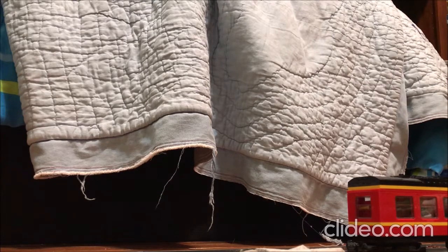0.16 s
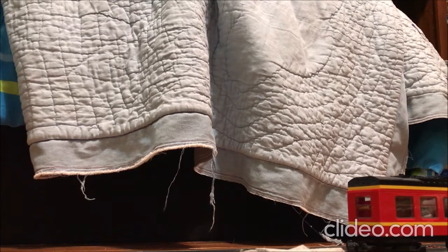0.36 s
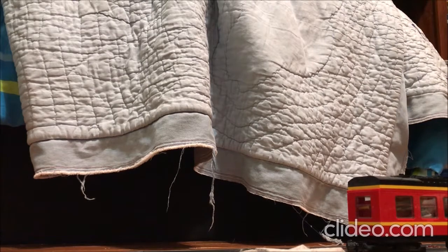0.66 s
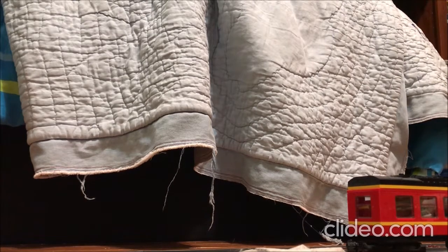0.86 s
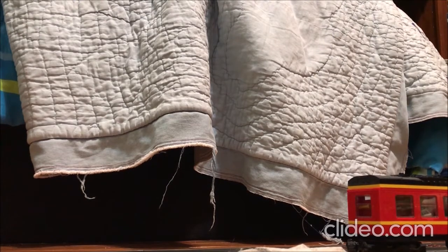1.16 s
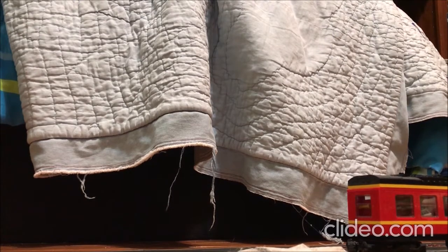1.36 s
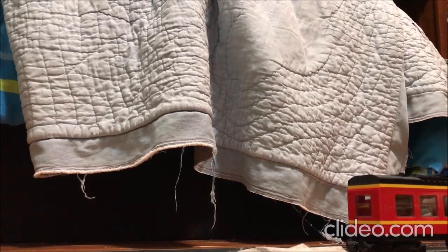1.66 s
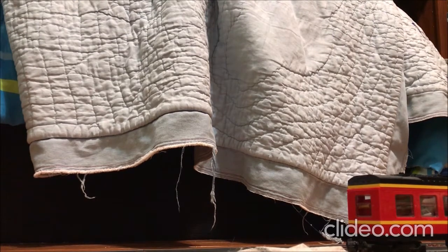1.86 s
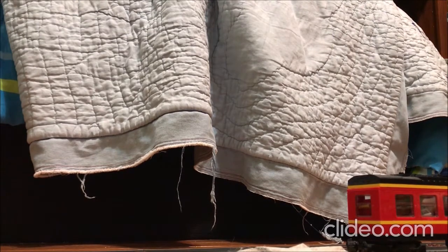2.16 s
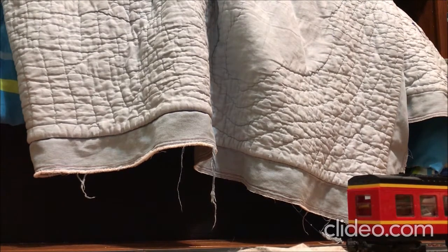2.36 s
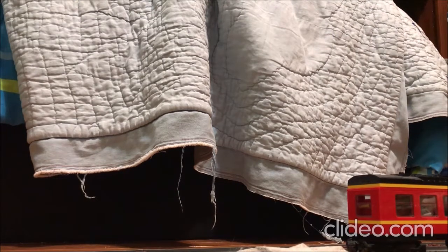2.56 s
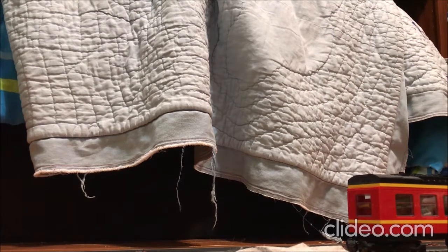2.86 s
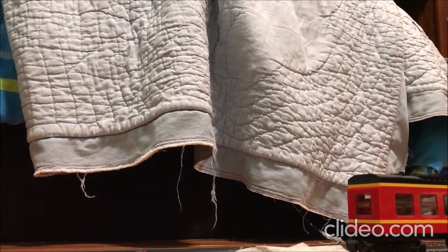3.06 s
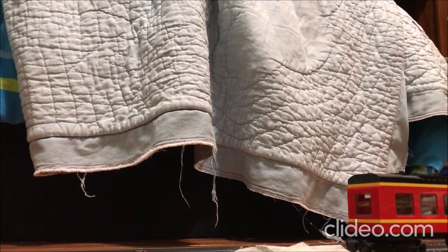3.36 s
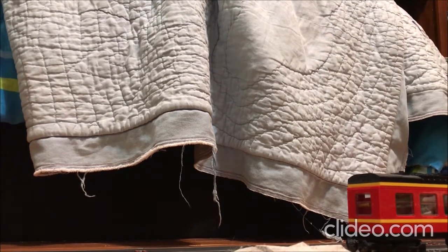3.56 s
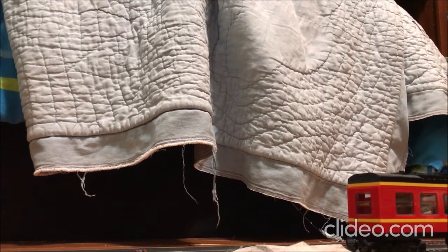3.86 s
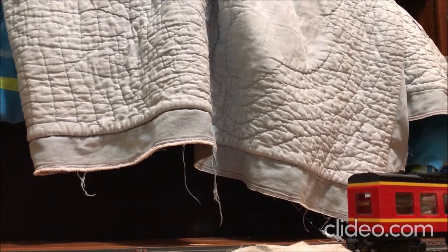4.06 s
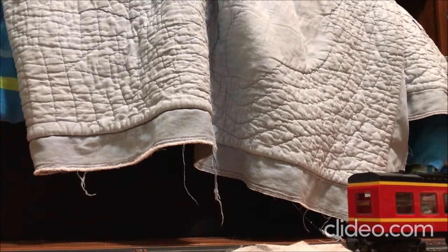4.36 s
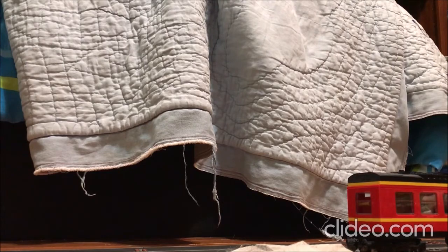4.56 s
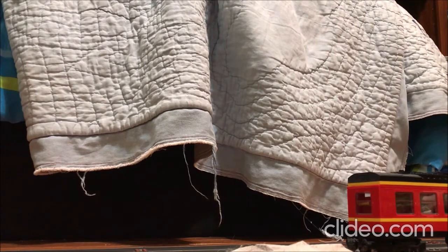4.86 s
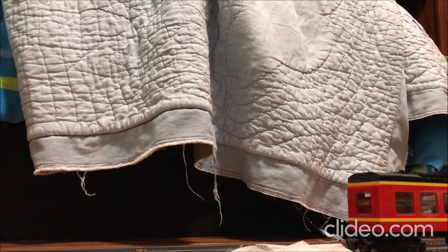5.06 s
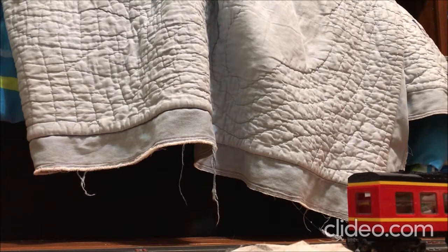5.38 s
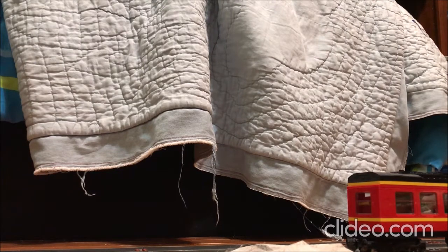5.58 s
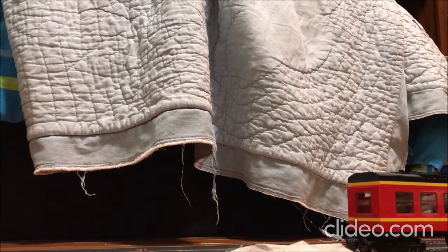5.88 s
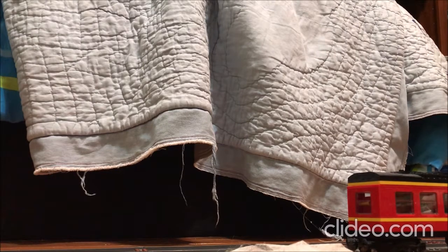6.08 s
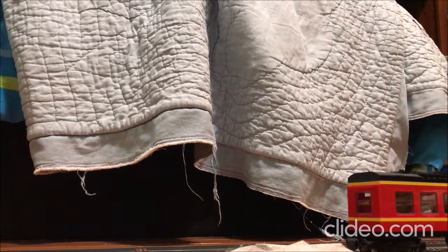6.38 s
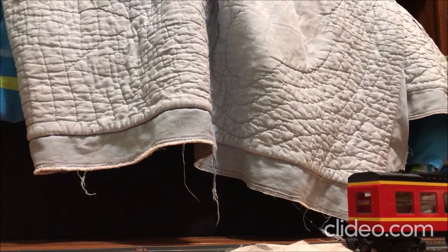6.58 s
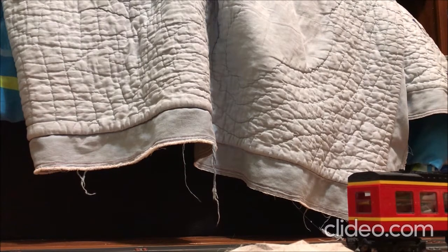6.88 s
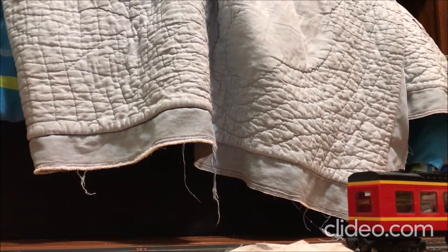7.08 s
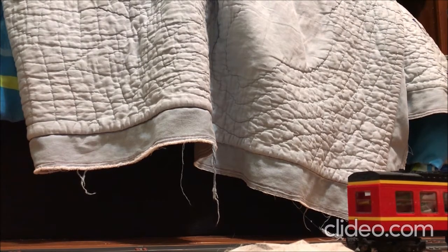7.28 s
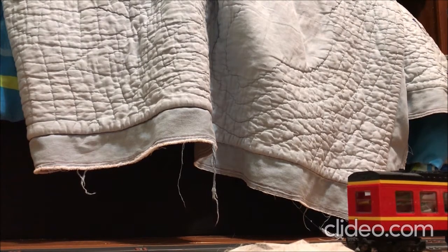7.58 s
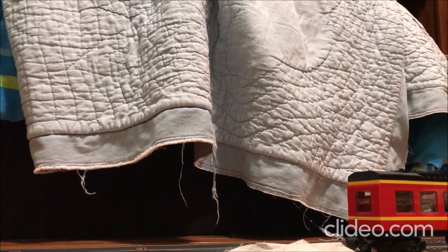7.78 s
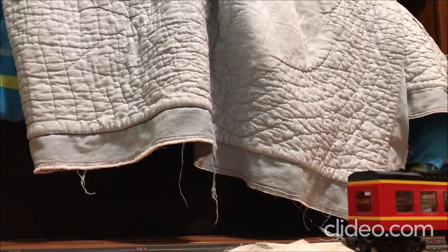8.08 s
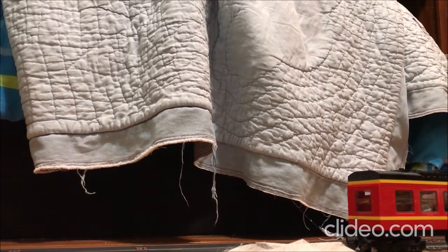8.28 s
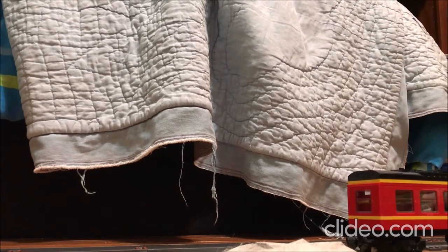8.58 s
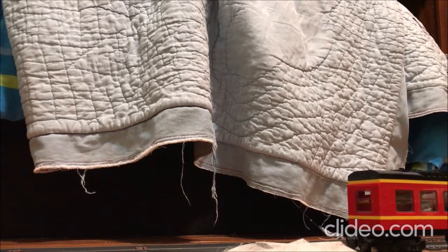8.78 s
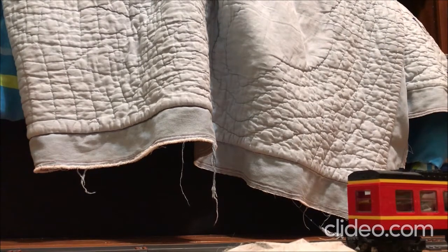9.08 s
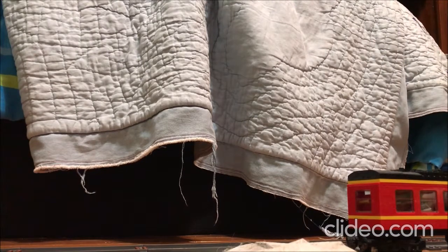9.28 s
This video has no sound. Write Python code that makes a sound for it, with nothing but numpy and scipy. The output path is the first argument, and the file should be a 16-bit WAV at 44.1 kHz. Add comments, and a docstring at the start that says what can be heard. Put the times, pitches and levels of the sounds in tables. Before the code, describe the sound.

Hands rummage through hollow plastic toy bricks close to a phone microphone. Bright clicks and short gritty scrapes cluster in the first second and a half, thin to sparse ticks, then return in busier bursts with two strong clacks late on. Soft floor thuds sit under a few knocks. A faint low motor hum and hiss continue throughout in a small, dull, cloth-softened room.

```python
"""Hollow plastic bricks click and scrape as hands sort and press them on a cloth-strewn floor.
Ragged contacts excite their modes: clicks are single blows, scrapes are streams of tiny slips.
Soft thuds are decaying sines; a small soft room adds a short dull tail to all these contacts.
Behind them a motor hums as wavering sines, and coloured noise makes the room air and microphone hiss.
The phone close by cuts the top."""
import sys
import numpy as np
from scipy import signal
from scipy.fft import rfft, irfft
from scipy.io import wavfile
from scipy.ndimage import uniform_filter1d

SR = 44100
rng = np.random.default_rng(int(sys.argv[2]) if len(sys.argv) > 2 else 0)


def generate_wav(sig):
    """Save sig (samples, or channels by samples) to the path in sys.argv[1] as 16-bit PCM at SR."""
    pcm = np.round(np.clip(np.atleast_2d(sig).T, -1, 1) * 32767).astype(np.int16)
    wavfile.write(sys.argv[1], SR, pcm)


N = 415863

# Brick clicks: start_s, wall_peak_db, then hollow_db, body_db, edge_db (peaks against the wall ring),
# near_hz (low mode nearest the blow)
BRICK_CLICKS = [(0.221, -48.5, -11.5, -18, 3, 990), (0.262, -44.5, -16, -4, 0.5, 912),
                (0.3425, -38, -9, -23, -4, 614), (0.3537, -27, -39, -28, -4, 2600),
                (0.3637, -29, -31, -25, 0, 2160), (0.407, -25, -37, -5, -3.5, 1720),
                (0.4334, -27, -17, -0.5, 1.5, 1980), (0.4474, -29.5, -13, -1.5, -6, 2020),
                (0.482, -35.5, -16, -13, 6, 2120), (0.7267, -41, -7, -19, -9, 775),
                (0.7794, -36.5, -13, -5, -16, 704), (0.8243, -31, -28, -17, -13, 2370),
                (0.828, -34, -28, -12, -3, 2400), (0.851, -31, -29, -16, -4, 2430),
                (0.8537, -18, -18, -22, -3.5, 2260), (0.8581, -21, -23, -5.5, -17, 2460),
                (0.868, -27, -6, -11, -8, 2300), (0.9064, -22.5, -38, -20, -14, 2370),
                (0.9764, -39, 1, -6, -13, 646), (1.1113, -51, -11, -19, -18, 727),
                (1.212, -38, -11, -7, -11, 2170), (1.264, -29.5, -29, -8, -4.5, 2390),
                (1.2751, -38, 3, 0, -14, 780), (1.2895, -41, -12, 7, -11, 2120),
                (1.3257, -15, -25, 0, -20, 1810), (1.3747, -19, -16.5, -2, -34, 2150),
                (1.4066, -24.5, -13, -1.5, -33, 2130), (1.465, -31.5, -7, -20, -7, 775),
                (1.51, -18, -24, -4, -19, 2170), (1.5691, -42.5, 6.5, 4, -20, 740),
                (1.583, -45, -15, 6, -17, 2200), (1.6366, -37.5, -27, 3, 0, 2470),
                (1.6547, -41, -10, 4, -7, 2120), (1.6788, -32, -31, -1.5, 2, 2230),
                (1.691, -40, -24, -8, -8, 2480), (1.916, -47, -7.5, 3.5, 5, 2540),
                (2.053, -50.5, -10, -17, -0.5, 2400), (2.156, -42.5, -33, -16, -4.5, 2600),
                (2.161, -43, -28, -15, -8, 2500), (2.2277, -35.5, -29, -13, -3.5, 2580),
                (2.272, -41, -31, -29, -3, 2370), (2.3067, -45, -8, -5, -5, 1200),
                (2.357, -37.5, -21, -30, -1, 1030), (2.4674, -54.5, 2.5, 0, -8, 931),
                (2.5335, -40.5, -3, -28, -16, 703), (2.6579, -52.5, 12, -5, -9, 945),
                (2.7426, -45, -20, -17, -24, 958), (2.992, -42, -28, -5.5, -2, 2130),
                (3.1907, -44.5, -22, -2, 0.5, 1040), (3.3005, -26.5, -8.5, -0.5, -2.5, 2020),
                (3.341, -32, -15, -3, -1, 2090), (3.3913, -47.5, -5, 12.5, -14, 2240),
                (3.5915, -34, -15, -3, -9, 2140), (3.627, -37, -17, -8, -18, 2260),
                (3.727, -40, -24, 0, -17, 2200), (3.815, -43, -15.5, -3, -5, 2250),
                (3.8738, -42, -13, 2, -7, 2200), (4.043, -40.5, -20, -2.5, -4, 2200),
                (4.0908, -39, -28, -6, -25, 2330), (4.1453, -41, -16, -12, -9, 1310),
                (4.2482, -50.5, -12.5, -18, -13, 2240), (4.545, -44, -17, -7.5, -1, 2300),
                (4.5743, -44.5, -22, -4, 3, 1050), (4.6795, -47.5, -18, -1, 7, 2250),
                (5.201, -34.5, -16, -8.5, -30, 1250), (5.2698, -45.5, -16, -7, -24, 2210),
                (5.3955, -37.5, -35, -2, -22, 1800), (5.7394, -50, -23, 4, -8, 2300),
                (6.0861, -50.5, -2, 4, -11, 2320), (6.288, -36, -29, -1, -17, 2140),
                (6.2954, -29.5, -25, -3, -4, 2450), (6.357, -19, -45, -11.5, -17, 2140),
                (6.3972, -30.5, -18, -2.5, 3.5, 2140), (6.4822, -44, -11, 3, -10, 1250),
                (6.6037, -43.5, -6, -9, -25, 900), (6.6421, -19.5, -29, -4, -3.5, 1380),
                (6.66, -36.5, -4, -4, -3, 1500), (6.7432, -41, -12, -1, 7, 2590),
                (6.786, -34, -15, -1, -4, 2450), (6.793, -33.5, -6.5, -4, 0, 1324),
                (6.8157, -30.5, -21, 7.5, 3.5, 1460), (6.8849, -30, -15, 0, -4.5, 1230),
                (7.0383, -40.5, -18, -4, -17, 2530), (7.217, -11.5, -8, -2.5, -6.5, 822),
                (7.3374, -40, -20, -8, -0.5, 2550), (7.3813, -30, -14, -3.5, -34, 2500),
                (7.436, -43, 1, 5, -21, 610), (7.585, -38, -29, -26, -10, 1480),
                (7.6305, -34.5, -13, -5, -11, 2260), (7.649, -33, -29, -23, 1, 2360),
                (7.831, -41.5, -7, -2, -23, 2040), (7.8507, -40, -17, -8, 3, 2200),
                (7.86, -37, -7, -6, -3, 1130), (7.9317, -43, -8, -12, -19, 1120),
                (7.954, -40, -17, -11, 4, 1240), (7.9743, -48, -18, -12, -5, 2200),
                (8.0292, -38, -15, -11, -0.5, 1070), (8.086, -42, -14, -4, -3, 1450),
                (8.1634, -37, -28, -6, 0, 1200), (8.2104, -46, -29, -6, -9, 2200),
                (8.2248, -38, -33, -8, 9, 1980), (8.246, -45, -24, -16, 3, 2200),
                (8.3583, -28.5, -44, -6, -12, 2550), (8.4387, -39, -25, -8.5, 8, 2080),
                (8.522, -40, -23, -5.5, -3, 713), (8.692, -35.5, -24, -9.5, -14, 2440),
                (8.7144, -36, -16, -1.5, -3, 2390), (8.7563, -40, -28, -7, 3, 1530),
                (8.82, -43, -15, 2, -7, 1400), (8.8357, -41, -17, -8, 6, 2210),
                (8.87, -25, -16, -10.5, -6, 2160), (8.8957, -27.5, -25, -6, -3, 1600),
                (8.9187, -9.5, -19, -1, -6, 1690), (8.9451, -21.5, -40, -3, -4, 2320),
                (8.9707, -33, -24, -17, -2, 1330), (9.0236, -29, -32, -11, -0.5, 2130),
                (9.0706, -36, -4, -2, -24, 1500), (9.2756, -50.5, -2, 2.5, -17, 750),
                (9.413, -44.5, -16, -3.5, -22, 1480)]
# Clicks where bare plastic snaps with a much shorter contact: start_s
SNAP_TIMES = [1.51, 2.227, 2.992, 4.545, 4.574, 7.955, 8.225, 8.359]

# Brick modes by family, before the blow favours some and the brick's size shifts them:
# pitch_hz, level_db (relative), t60_s
HOLLOW_MODES = [(602, -14, 0.032), (752, 8.5, 0.018), (950, 15, 0.046), (1141, 8, 0.057)]
BODY_MODES = [(1315, 1.5, 0.032), (1535, 8, 0.01), (1963, -7.5, 0.057), (2190, 10, 0.011), (2515, 6, 0.014)]
WALL_MODES = [(3236, 1, 0.0096), (3640, 4, 0.0083), (4230, 1, 0.01), (4740, -16, 0.036)]
EDGE_MODES = [(6375, 7.5, 0.0066), (7250, 6, 0.0036), (8665, -5, 0.019), (9100, -10, 0.0083),
              (11200, -3, 0.005), (11900, -20, 0.013), (17400, -7, 0.0027)]
SIZE_SPREAD = 0.025  # standard deviation of the mode shift from click to click, as a share
# The bricks in hand change, and with them the hollow mode that sounds most: time_s, pitch_hz
HANDFUL_PITCH = [(0, 706), (1.7, 770), (2.6, 884), (4.8, 954), (6.2, 1120), (7.0, 1120), (7.2, 840),
                 (9.43, 800)]

# A brick is dragged over cloth or another brick: start_s, length_s, wall_db (before the scrape's trim),
# then hollow_db, body_db, edge_db (against the wall ring)
BRICK_DRAGS = [(0.123, 0.0053, -53.5, -25, -7, -5), (0.341, 0.15, -46.5, -29, -4, -7),
               (0.571, 0.039, -53, -32, -1.5, -9.5), (0.813, 0.03, -50.5, -15, 1.5, -2),
               (.866, 0.015, -39.5, -18, -4.5, -1), (.9, 0.032, -47.5, -23, -2.5, -5),
               (.96, 0.015, -49, -9, -8, -7), (1.265, 0.014, -53, -21, 6, -12),
               (1.335, 0.17, -45.5, -11, -1.5, -25.5), (1.5, 0.036, -51.5, -10, -5, -17),
               (1.565, 0.061, -54, -1, 2, -23), (1.657, 0.036, -47, -8.5, 1, -2.5),
               (1.905, 0.011, -61, -12, -5, 6), (2.153, 0.0092, -60, -20, -15, -14),
               (2.186, 0.011, -58.5, -24, -20, -0.5), (2.28, 0.02, -61, -20, -15, -6),
               (2.31, .065, -64.5, -12, -12, 0), (2.515, 0.045, -59, -4.5, -1.5, -4.5),
               (2.643, 0.065, -59.5, 5.5, -2, -7), (2.73, 0.13, -66, -2, -1, -4),
               (3.21, 0.06, -63, -1, 0.5, -4), (3.308, 0.03, -40.5, -19, -1.5, -4),
               (3.37, 0.057, -57, -22, 3.5, -25), (3.598, 0.058, -54, -12, 1, -6),
               (3.722, 0.0089, -55.5, -16, -2, -5), (3.863, 0.034, -55.5, -11, -6.5, -1),
               (4.04, 0.13, -62, -12, -2.5, -4), (4.24, 0.014, -54.5, -7, 0.5, -10),
               (4.678, 0.01, -59, -5, -2, -1.5), (5.179, 0.062, -57, -12, -2, -7),
               (5.385, 0.02, -52.5, -27, 1, -24), (5.711, 0.042, -58.5, -10, -0.5, -5),
               (5.85, 0.018, -59, -19, 4, -3), (6.012, 0.044, -61.5, -22, -7, -4),
               (6.075, 0.018, -58, -16, 4, -24), (6.286, 0.12, -47, -29, -0.5, -10),
               (6.468, 0.035, -49.5, -4, -0.5, -8), (6.653, 0.047, -57, 5.5, -1, 3.5),
               (6.76, 0.093, -50.5, -8, 1.5, -4), (6.874, 0.035, -48, -8, 1, -3),
               (7.03, 0.023, -58.5, -27, 1.5, -2), (7.162, 0.018, -52.5, -1, 0, -2.5),
               (7.195, 0.018, -60, 18, -12, -1), (7.225, 0.027, -41.5, -1, 0.5, 0),
               (7.325, 0.11, -49.5, -6, -0.5, -11), (7.581, 0.07, -51, -27, -0.5, -5.5),
               (7.624, 0.03, -43, -21, 0, -7), (7.828, 0.045, -52.5, -16, 1, -7),
               (7.925, 0.058, -53, -18, -2.5, -5), (8.02, 0.074, -58, -18, -2, -13),
               (8.13, 0.13, -63.5, -11, 1, -8), (8.432, 0.058, -55, -12, -4, -6.5),
               (8.7, 0.079, -50, -9, -1, -5), (8.8, 0.078, -53.5, -16, -1, -21),
               (8.906, 0.0085, -30.5, -11.5, -8, -7), (8.956, 0.0087, -30.5, -20.5, -2.5, 0),
               (8.99, 0.072, -40.5, -12, -3, -9.5)]
DRAG_RISE_DB_S, DRAG_FALL_DB_S = 1997, 457
# A clicked brick slides on: base level, share of the click's dB that it follows, fade
SETTLE_DB, SETTLE_SHARE, SETTLE_DB_S = -38, 0.54, 514
# Hands keep stirring the heap: time_s, wall_db (before the scrape's trim)
HEAP_STIR = [(0.0, -70.5), (0.52, -66), (1.26, -59.5), (1.49, -51), (1.76, -71.5), (4.02, -68), (4.33, -76),
             (6.38, -64.5), (6.54, -59.5), (7.14, -65), (7.35, -55), (7.69, -65.5), (8.06, -61.5),
             (8.3, -71), (8.72, -65.5), (8.9, -66), (9.09, -65.5), (9.43, -65)]
STIR_HOLLOW_DB, STIR_BODY_DB, STIR_EDGE_DB = -5, -2, -5.5  # against the wall ring

# Hands and bricks bump the floor: start_s, level_db (before the decay), pitch_hz
FLOOR_THUDS = [(0.332, -42.5, 197), (0.848, -42, 100), (1.328, -54, 300), (2.148, -58, 263),
               (2.304, -53.5, 330), (2.352, -47, 172), (2.445, -53, 280), (3.302, -50, 91.5),
               (6.402, -42, 93), (7.218, -35, 274), (8.9, -35.5, 175)]
# Motor and mains lines: pitch_hz, level_db (rms, before wavering)
HUM_LINES = [(58.4, -50.5), (116.8, -70), (120.1, -72.5), (175.2, -72.5), (206, -90), (233.6, -82.5)]
# Colour of room air and microphone hiss: pitch_hz, level_db (relative, per Hz)
AIR_COLOUR = [(25, 2.5), (45, 2.5), (75, 9), (100, 0.5), (190, 3), (440, -10), (990, -21), (1900, -23),
              (3800, -36), (5500, -28.5), (10500, -29), (11600, -29), (11950, -16), (12300, -26.5),
              (16000, -30)]
# Drift of the air below 500 Hz: time_s, level_db (relative)
RUMBLE_DRIFT = [(2.4, 1), (4.4, -0.5), (5.8, -1), (6.4, 0.5)]
AIR_DB = -60  # rms of the whole air layer
ROOM_T60_S, ROOM_DB, ROOM_HZ = 0.089, -17, 6200
TOP_HZ = 15900


def undb(db):
    """Turn decibels into an amplitude factor."""
    return 10 ** (np.asarray(db) / 20)


def level(x, db):
    """Scale a signal to an rms level in dB."""
    return x * undb(db) / np.sqrt(np.mean(x ** 2))


def follow(table, t):
    """Glide in straight lines through a two-column table of times and values."""
    return np.interp(t, *np.transpose(table))


def fade(t60, seconds):
    """Exponential decay that loses 60 dB in t60."""
    return np.exp(-np.log(1000) * np.arange(int(seconds * SR)) / SR / t60)


def walk(rate):
    """Random levels held 1 / rate s and slewed twice; spread near 1."""
    hold = int(SR / rate)
    steps = np.repeat(rng.standard_normal(N // hold + 1), hold)
    return 2.48 * uniform_filter1d(uniform_filter1d(steps, hold), hold)[:N]


def ring(modes, detune=1):
    """Impulse response of a set of modes; a small object radiates little below its lowest mode."""
    seconds = 0.06
    t = np.arange(int(seconds * SR)) / SR
    wave = sum(undb(db) * np.sin(2 * np.pi * hz * detune * t) * fade(t60, seconds)
               for hz, db, t60 in modes)
    low_cut = signal.butter(2, 1.026 * modes[0][0], "high", fs=SR, output="sos")
    return signal.sosfilt(low_cut, wave)


def effort():
    """Gains of wall, hollow, body and edge: stirring, drags and the slide after each click add as power."""
    t = np.arange(N) / SR
    stir_colour_db = [[0], [STIR_HOLLOW_DB], [STIR_BODY_DB], [STIR_EDGE_DB]]
    gain = undb(follow(HEAP_STIR, t)) * undb(stir_colour_db)
    drags = [(*row, DRAG_FALL_DB_S, DRAG_RISE_DB_S) for row in BRICK_DRAGS]
    # A slide has no length of its own and starts at once
    slides = [(s, 0, SETTLE_SHARE * db + SETTLE_DB, *colour_db, SETTLE_DB_S, np.inf)
              for s, db, *colour_db, _ in BRICK_CLICKS]
    for s, length, db, *colour_db, fall_db_s, rise_db_s in drags + slides:
        near = slice(max(int(s * SR) - SR // 10, 0), int((s + length) * SR) + SR // 4)
        before_db = np.where(t[near] < s, rise_db_s, 0) * np.abs(s - t[near])
        after_db = fall_db_s * np.maximum(t[near] - s - length, 0)
        family_db = db + np.array([0, *colour_db])[:, None]
        gain[:, near] = np.hypot(gain[:, near], undb(family_db - before_db - after_db))
    return gain


def slips(rate, scatter_db, rub_db, touch_s):
    """Small ragged contacts of scattered size over a fine rub; the mean drag stays even."""
    starts = (rng.random(N) < rate / SR) * undb(scatter_db * rng.exponential(size=N))
    contacts = signal.lfilter([1], [1, -np.exp(-1 / (touch_s * SR))], starts)
    grip = contacts + undb(rub_db + 5.2 * walk(70))
    jolt = grip * rng.standard_normal(N)
    return jolt / np.sqrt(uniform_filter1d(jolt ** 2, int(0.0455 * SR)) + 1e-9)


def scrape(count=3, spread=0.069, fall_db=25):
    """Slipping bricks of several sizes ring their modes; the colour follows the handful and flickers."""
    wall, hollow, body, edge = effort()
    pushes = [slips(rate=150, scatter_db=3.8, rub_db=-10.5, touch_s=0.0018) for _ in range(count)]
    sizes = 1 + spread * np.linspace(-1, 1, count)
    hand_hz = follow(HANDFUL_PITCH, np.arange(N) / SR)
    families = [(WALL_MODES, wall), (BODY_MODES, body), (EDGE_MODES, edge)]
    # Each hollow mode loses fall_db an octave away from the handful's pitch
    for mode in HOLLOW_MODES:
        octaves_off = np.abs(np.log2(mode[0] / hand_hz))
        families.append(([mode], hollow * undb(-fall_db * octaves_off)))
    out = 0
    for modes, gain in families:
        family = sum(signal.oaconvolve(push, ring(modes, size))[:N] for push, size in zip(pushes, sizes))
        out = out + gain * undb(-2.5 + 1.0 * walk(25)) * level(family, 0)
    return out


def hum():
    """Motor and mains lines are sines; the close pair beats a few times a second, the weak lines waver most."""
    turn = 2 * np.pi * np.arange(N) / SR + 0.002 * walk(1.5)  # shared slight pitch wander
    waver_db = [0.15] + [1.8] * (len(HUM_LINES) - 1)
    out = 0
    for (hz, db), w_db in zip(HUM_LINES, waver_db):
        amplitude = np.sqrt(2) * undb(db + w_db * walk(7.7))
        out = out + amplitude * np.sin(hz * turn + 2 * np.pi * rng.random())
    return out


def air():
    """Coloured noise in three bands; the rumble and the hiss flicker apart from each other."""
    hz, db = np.transpose(AIR_COLOUR)
    bins = np.arange(N // 2 + 1) * SR / N + 1
    colour = undb(np.interp(np.log(bins), np.log(hz), db))
    rumble_db = follow(RUMBLE_DRIFT, np.arange(N) / SR)
    # Band edges in Hz, then drift and flicker in dB
    bands = [(0, 500, rumble_db, 1.2), (500, 5000, 0, 2.2), (5000, SR, 0, 2.2)]
    out = 0
    for low, high, drift_db, flicker_db in bands:
        spectrum = rfft(rng.standard_normal(N)) * colour * (bins >= low) * (bins < high)
        out = out + irfft(spectrum, N) * undb(drift_db + flicker_db * walk(16))
    return level(out, AIR_DB)


def struck(modes, near_hz, fall_db=20):
    """A blow near one mode favours it: the others lose fall_db an octave; a family out of reach rings evenly."""
    reached = modes[0][0] / 1.15 < near_hz < modes[-1][0] * 1.15
    return [(hz, db - reached * fall_db * abs(np.log2(hz / near_hz)), t60) for hz, db, t60 in modes]


def clicks(rise=0.65, touch_s=0.0016, snap_s=0.00059, ragged_db=4.5):
    """Each click is a ragged contact that swells and dies within ms; bricks differ in size, so the modes shift."""
    out = np.zeros(N + SR)
    chance = rng.standard_normal((len(BRICK_CLICKS), 3, 1024))
    t = np.arange(1024) / SR
    for (s, wall_db, hollow_db, body_db, edge_db, near_hz), (push, rag, size) in zip(BRICK_CLICKS, chance):
        snaps = np.isclose(s, SNAP_TIMES, rtol=0, atol=0.004).any()
        lasts = snap_s if snaps else touch_s
        swell = (1 - np.exp(-t / (rise * lasts))) * np.exp(-t / lasts)
        contact = push * undb(ragged_db * np.repeat(rag[:32], 32)) * swell
        # A blow above the hollow modes leaves them to the handful's pitch
        hollow_hz = near_hz if near_hz < BODY_MODES[0][0] else follow(HANDFUL_PITCH, s)
        families = [(WALL_MODES, 0), (struck(HOLLOW_MODES, hollow_hz, fall_db=69), hollow_db),
                    (struck(BODY_MODES, near_hz), body_db), (EDGE_MODES, edge_db)]
        for modes, db in families:
            part = signal.fftconvolve(contact, ring(modes, 1 + SIZE_SPREAD * size[0]))
            out[int(s * SR):][:len(part)] += undb(wall_db + db) * part / np.abs(part).max()
    return out[:N]


def thuds(t60=0.058):
    """A soft blow rings the floor boards briefly, as a decaying sine."""
    out = np.zeros(N + SR)
    t = np.arange(SR // 4) / SR
    for s, db, hz in FLOOR_THUDS:
        out[int(s * SR):][:len(t)] += undb(db) * np.sin(2 * np.pi * hz * t) * fade(t60, 0.25)
    return out[:N]


def room(x):
    """A short dull tail of decaying noise that starts with the first wall echoes."""
    tail = rng.standard_normal(SR // 2) * fade(ROOM_T60_S, 0.5)
    tail = signal.sosfilt(signal.butter(1, ROOM_HZ, fs=SR, output="sos"), tail)
    tail[:int(0.006 * SR)] = 0
    tail = tail / np.sqrt(np.sum(tail ** 2))
    return x + undb(ROOM_DB) * signal.fftconvolve(x, tail)[:N]


def scene():
    """Brick and floor sounds ring in the room; hum and air lie under them, in mono."""
    contacts = scrape() + clicks() + thuds()
    return (room(contacts) + hum() + air())[None]


def record(dry):
    """The phone cuts the top with a steep low-pass."""
    return signal.sosfilt(signal.ellip(8, 0.2, 70, TOP_HZ, fs=SR, output="sos"), dry)


dry = scene()
out = record(dry)
generate_wav(out)
```